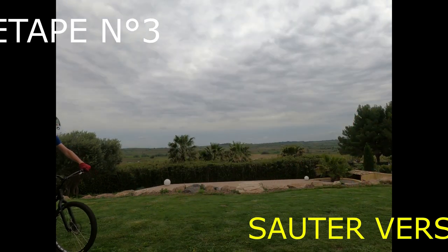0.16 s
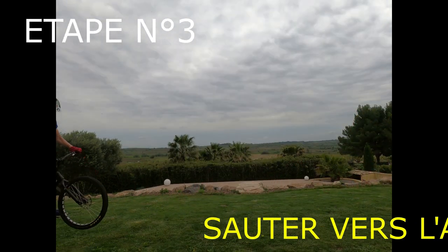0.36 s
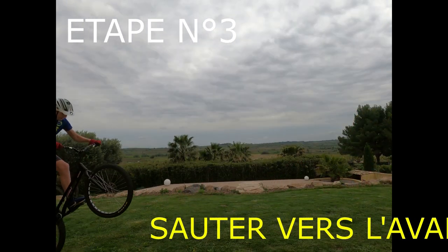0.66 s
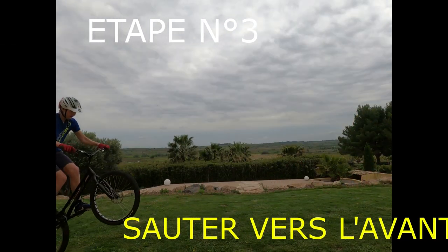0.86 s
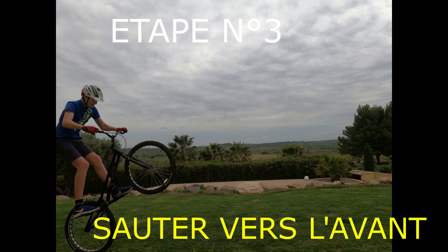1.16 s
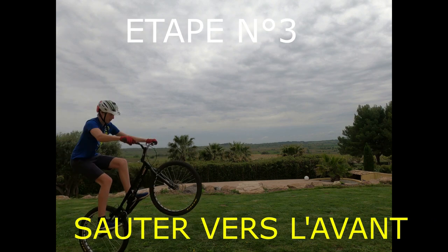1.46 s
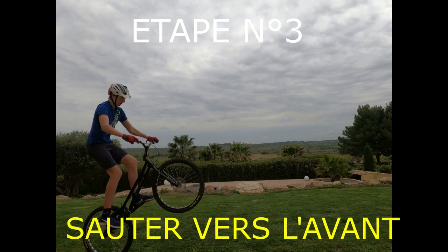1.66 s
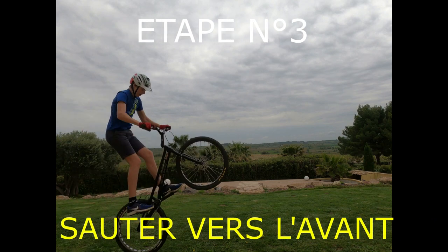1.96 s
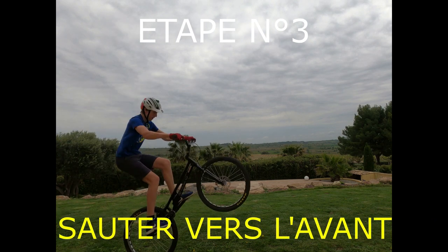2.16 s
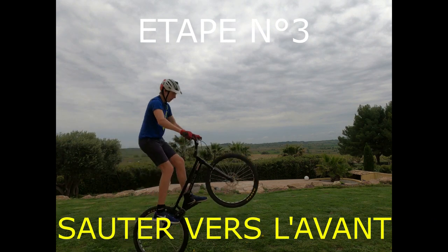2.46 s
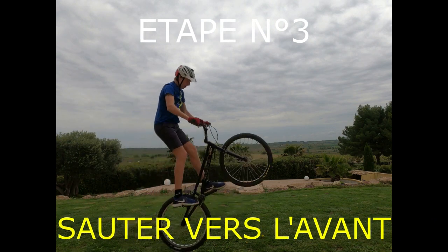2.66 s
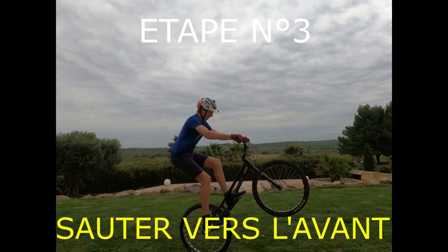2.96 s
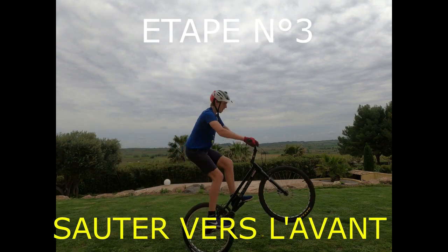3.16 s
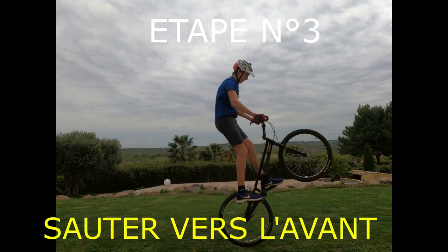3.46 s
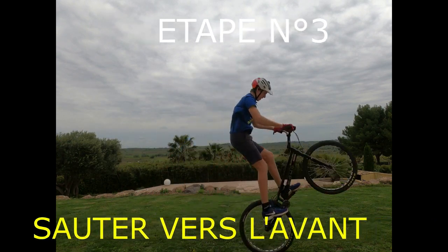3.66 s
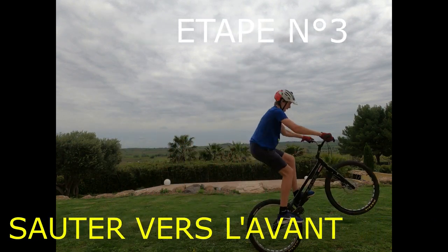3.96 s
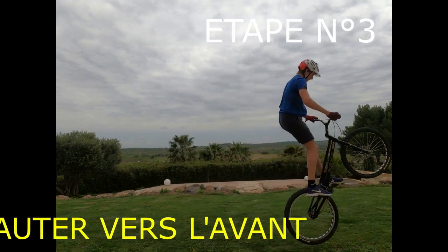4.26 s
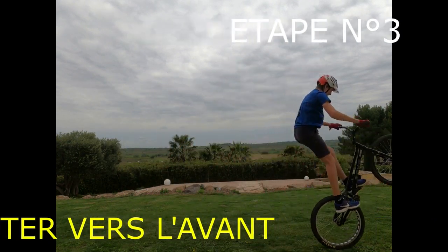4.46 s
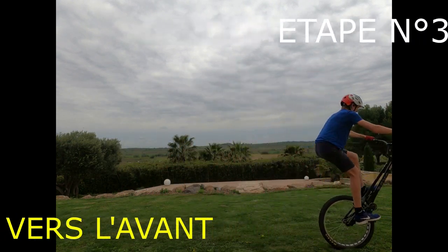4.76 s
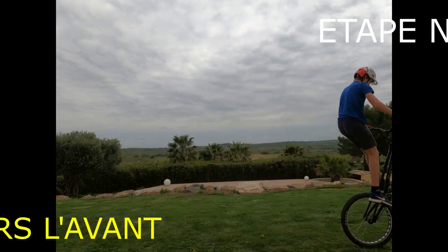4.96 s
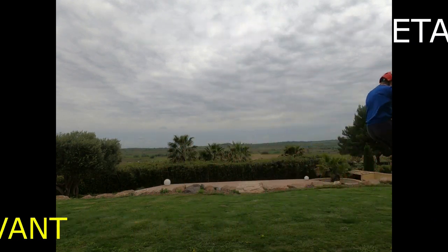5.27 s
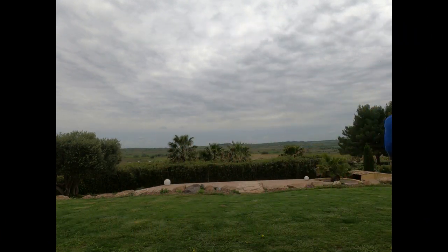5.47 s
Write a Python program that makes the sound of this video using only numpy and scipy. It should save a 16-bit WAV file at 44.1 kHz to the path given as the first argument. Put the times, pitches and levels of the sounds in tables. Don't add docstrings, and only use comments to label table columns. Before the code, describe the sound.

Outdoors on a lawn, a bicycle hops on its rear wheel near a small camera. Bursts of freewheel clicking and chain whirr alternate with dull frame knocks. The rim brake gives tiny chirps and a few loud, brief squeals. Quiet distant traffic, leaves and a faint hum lie beneath. Low wind rumble swells into a rough, popping gust late, strongest on the right; the image is almost mono before that.

```python
import sys
import numpy as np
from scipy import signal
from scipy.fft import rfft, irfft, next_fast_len
from scipy.io import wavfile
from scipy.ndimage import uniform_filter1d

SR = 44100
rng = np.random.default_rng(int(sys.argv[2]) if len(sys.argv) > 2 else 0)


def linear_from_db(decibels):
    return 10 ** (np.asarray(decibels, float) / 20)


def master(y):
    cut = np.clip(np.atleast_2d(y).T, -1, 1)
    pcm = np.round(cut * 32767)
    wavfile.write(sys.argv[1], SR, pcm.astype(np.int16))


N = 248062

CALM_HZ, CHATTER_SPAN_HZ, CREEP_SHARP = 1135, 40, 0.017


def curve(rows):
    return np.interp(np.arange(N) / SR, *np.transpose(rows))


def gated(rows, fade, tail):
    t = np.arange(N) / SR
    on = np.zeros(N)
    for start, end, first_db, last_db in rows:
        on += (t >= start) * (t < end) * linear_from_db(np.interp(t, [start, end], [first_db, last_db]))
    keep = np.exp(-1 / (tail * SR))
    dying = signal.lfilter([1 - keep], [1, -keep], on)
    return uniform_filter1d(np.maximum(on, dying), int(fade * SR))


def read(points, hz):
    f, value = np.transpose(points)
    return np.interp(np.log(hz + 1), np.log(f + 1), value)


def evened(x):
    return x / np.sqrt(np.mean(x ** 2) + 1e-20)


def band(x, lo_hz, hi_hz, order=2):
    return signal.sosfilt(signal.butter(order, [lo_hz, hi_hz], "bandpass", fs=SR, output="sos"), x)


def wobble(count, rate_hz):
    size = next_fast_len(count)
    hz = np.fft.rfftfreq(size, 1 / SR)
    spectrum = rfft(rng.standard_normal(size)) * (hz > 0) / (1 + (hz / rate_hz) ** 4)
    return evened(irfft(spectrum, size)[:count])


def coloured(x, points):
    size = next_fast_len(N)
    gain = linear_from_db(read(points, np.fft.rfftfreq(size, 1 / SR)))
    return irfft(rfft(x, size) * gain, size)[..., :N]


def resonate(x, hz, width):
    return signal.lfilter(*signal.iirpeak(hz, hz / width, SR), x)


def add(mix, s, sound):
    part = mix[round(s * SR):][:len(sound)]
    part += sound[:len(part)]


def brake():
    # grab_s, level_db, pitch_hz, hold_s, bite_db (added to the overtones)
    slips = [
        (0.975, -34.5, 1151, 0.005, 3),
        (1.247, -34.5, 1182, 0.0079, 5),
        (1.279, -44, 1086, .005, 4),
        (1.358, -52, 1120, 0.0055, 6),
        (1.997, -38, 1135, 0.01, -22),
        (2.037, -48, 1135, .008, -28),
        (2.751, -49.5, 1130, 0.011, 11),
        (3.294, -38, 1155, 0.0075, -13),
        (4.092, -46, 1084, 0.0073, -21),
    ]
    # time_s, level_db, pitch_hz, second_db, upper_db (overtones)
    squeezes = [
        [(.562, -50, 1160, -11, -25), (.576, -41.5, 1194, 0, -24), (.584, -42.5, 1146, -1, -7),
         (.594, -18, 1119, 0, -6.5), (.601, -21, 1158, -7, -9.5), (.608, -15.5, 1150, -10, -19),
         (.62, -23, 1123, -3.5, -29), (.634, -23.5, 1116, -11, -24), (.67, -44, 1170, -17, -25)],
        [(3.535, -45, 1122, -18, -30), (3.552, -30, 1154, -15, -32), (3.563, -18.5, 1114, -13, -20.5),
         (3.57, -16, 1118, -5.5, -16), (3.577, -20, 1119, -14, -18), (3.583, -19, 1124, -7, -8.5),
         (3.592, -30.5, 1125, -7, -10), (3.606, -25.5, 1103, -12.5, -28), (3.65, -47, 1103, -8, -25)],
        [(5.155, -45, 1140, -18, -22), (5.167, -29, 1135, -11, -16), (5.175, -21, 1140, 3, -9.5),
         (5.186, -28.5, 1149, -12, -16.5), (5.193, -31.5, 1138, -3, -14), (5.21, -24.5, 1120, -16, -26),
         (5.222, -42, 1174, 0, -22), (5.236, -32, 1153, -7, -17.5), (5.295, -50.5, 1150, 1, -11)],
        [(4.378, -44, 1150, -10, -25), (4.392, -48, 1136, -13, -32), (4.403, -25.5, 1146, -22, -27),
         (4.412, -34, 1156, -0.5, -28), (4.422, -45.5, 1142, -3, -26), (4.434, -40.5, 1113, -1.5, -18),
         (4.48, -53, 1150, -3, -18)],
        [(4.605, -59, 1201, 7, -17), (4.618, -28, 1190, -6.5, -30), (4.628, -34.5, 1218, -5, -18),
         (4.636, -56.5, 1197, 14, -16), (4.644, -31, 1204, -11, -26), (4.666, -44, 1185, -7, -23),
         (4.69, -44, 1166, -16, -20), (4.72, -52, 1160, -9, -17)],
    ]
    judders = [.014, .01, .034, .022, .03]
    out = np.zeros(N)
    for row in slips:
        add(out, *chirp(slip(*row), loose=1, judder=.004))
    for rows, judder in zip(squeezes, judders):
        add(out, *chirp(rows, loose=0, judder=judder))
    return out


def slip(s, db, hz, hold, bite_db):
    creep_s, ring_s = .03, .13
    creep_db, sag_db, release_db_per_s = db - 25, db - 4, 480
    second_db, upper_db = bite_db / 2 - 9, bite_db - 13
    scoop = 0.056 * np.clip((hz - CALM_HZ) / CHATTER_SPAN_HZ + 0.36, 0, 1)
    loose_hz, loose_overtones = hz * (1 - 0.012), (second_db - 4.5, upper_db - 4)
    grab_s = min(0.013 + .0005 * max(-27 - db, 0), creep_s * 4 / 5)
    return [(s - creep_s, creep_db, hz * (1 + CREEP_SHARP), *loose_overtones),
            (s - grab_s, creep_db, hz * (1 - scoop), second_db, upper_db),
            (s, db, hz * (1 - scoop / 2), second_db, upper_db),
            (s + hold, sag_db, hz, second_db, upper_db),
            (s + 2 * hold, sag_db - release_db_per_s * hold, loose_hz, *loose_overtones),
            (s + ring_s, sag_db - release_db_per_s * (ring_s - hold), loose_hz, *loose_overtones)]


def chirp(rows, loose, judder):
    # multiple, level_db
    overtones = [(3, 0), (4, -2.5), (5, -7), (6, -11.5), (7, -10), (8, -13.5), (9, -18.5), (10, -24),
                 (11, -25), (12, -24.5), (13, -36)]
    s, *columns = np.transpose(rows)
    t = np.arange(s[0], s[-1], 1 / SR)
    count = len(t)
    level_db, hz, second_db, upper_db = (np.interp(t, s, c) for c in columns)
    weak = loose * np.clip((-16.0 - level_db) / 18, 0, 1)
    level_db = uniform_filter1d(level_db, int(.004 * SR))
    pull, span = linear_from_db(level_db), int(.005 * SR)
    hz = uniform_filter1d(hz * pull, span) / uniform_filter1d(pull, span)
    chatter = loose * np.clip((hz.max() - CALM_HZ * (1 + CREEP_SHARP)) / CHATTER_SPAN_HZ, 0, 1)
    level_db = level_db + 3 * chatter * wobble(count, 90)
    waver = (judder + .014 * weak + .016 * chatter) * wobble(count, 250)
    waver = waver - uniform_filter1d(waver, int(.012 * SR))
    level_db = level_db + 60 * judder * wobble(count, 120)
    turns = np.cumsum(hz * (1 + waver)) / SR
    second = linear_from_db(second_db + 2.1 * wobble(count, 60))
    stack = np.cos(2 * np.pi * turns) + second * np.cos(2 * np.pi * (2 * turns + rng.random()))
    for k, db in overtones:
        gain = linear_from_db(db + upper_db - 12.4 * weak + 3 * wobble(count, 80))
        stack += gain * np.cos(2 * np.pi * (k * turns + rng.random()))
    return s[0], 1.56 * linear_from_db(level_db) * stack * signal.windows.tukey(count, .15)


def hub(x):
    # frequency_hz, level_db
    hub_colour = [(1820, -7), (3100, -3.5), (3250, -9), (3650, -6.5), (4870, 0.5), (6340, -6), (7110, -11),
                  (8650, -8.5), (11700, -18.5), (13200, -20), (15600, -27)]
    # frequency_hz, width_hz, level_db
    hub_rings = [(2750, 160, -33), (5000, 370, -19), (6170, 200, -13), (8650, 140, -7), (10300, 150, -8)]
    x = coloured(x, hub_colour)
    return 0.84 * x + sum(linear_from_db(db) * resonate(x, hz, width) for hz, width, db in hub_rings)


def freewheel():
    # click_s, peak_db
    pawls = [(0.0057, -46), (0.024, -47), (0.0407, -43), (0.0597, -41), (0.0726, -45), (0.0901, -41),
             (0.1092, -47), (0.1175, -48), (0.666, -41), (0.6838, -45), (0.6965, -46), (0.7125, -44),
             (0.7288, -45), (0.7432, -41), (0.757, -44), (0.7677, -40), (0.7784, -45),
             (0.7865, -42.5), (0.7952, -44), (0.806, -48), (0.828, -36), (0.9102, -42.5),
             (0.9776, -55), (1.1166, -47), (1.1281, -53), (1.1504, -54), (1.1592, -46), (1.1865, -44),
             (1.2078, -38), (1.2234, -44), (1.2323, -39), (1.2558, -44), (1.2717, -46), (1.2835, -56),
             (1.3027, -38), (1.3135, -48), (1.335, -39), (1.3547, -40), (1.3628, -48),
             (1.3806, -35.5), (1.3971, -54), (1.4156, -39), (1.4314, -36), (1.454, -39),
             (1.4662, -43), (1.4778, -36), (1.4995, -45), (1.5164, -37), (1.527, -46),
             (1.8966, -51), (1.9183, -55), (1.936, -39), (1.9561, -42), (1.9662, -37.5),
                    (1.981, -43.5), (1.9945, -40), (2.0152, -42), (2.048, -41), (2.077, -39.5),
                    (2.1082, -38.5), (2.1427, -40.5), (2.1565, -41.5), (2.1788, -40), (2.1948, -36.5),
                    (2.2068, -38), (2.222, -40), (2.2412, -38), (2.2651, -41), (2.2784, -36), (2.3006, -42),
                    (2.3181, -36.5), (2.4652, -58), (2.6807, -38.5), (2.695, -40), (2.7066, -37.5),
                    (2.7253, -39), (2.7642, -44), (2.7842, -46), (2.8021, -47), (2.855, -38), (2.9032, -36),
                    (2.958, -37.5), (2.9809, -44), (2.9902, -45), (2.9995, -38), (3.0116, -46),
                    (3.026, -42), (3.0419, -37.5), (3.0595, -39), (3.0709, -36.5), (3.0968, -37),
                    (3.1126, -39), (3.1492, -39), (3.19, -48), (3.2501, -81),
             (3.4791, -49.5), (3.4883, -45), (3.4973, -47), (3.5065, -40), (3.5155, -38), (3.543, -36),
                  (3.634, -48), (3.666, -39.5), (3.6784, -46), (3.7001, -54), (3.7121, -49), (3.724, -47),
                  (3.7708, -51), (3.7892, -36.5), (3.8467, -42), (3.867, -41), (3.898, -45), (3.9192, -47),
                  (3.9434, -50), (4.2771, -50), (4.3077, -46), (4.3409, -54), (4.358, -49), (4.3712, -52),
                  (4.3835, -50), (4.4297, -45), (4.4535, -49), (4.485, -53), (4.4957, -53), (4.5327, -53),
                  (4.5459, -51), (4.5732, -43), (4.6356, -43), (4.6461, -45), (4.6581, -43), (4.6696, -38),
                  (4.6864, -45), (4.6976, -41), (4.7231, -37), (4.746, -42), (4.7566, -58), (5.2194, -47),
                  (5.2289, -50), (5.2762, -52), (5.2855, -52), (5.293, -43), (5.3393, -44), (5.3504, -48),
                  (5.4296, -47.5), (5.4566, -45), (5.4905, -47), (5.5109, -50), (5.5329, -42),
                  (5.5601, -48), (5.5988, -45)]
    # start_s, end_s, first_db, last_db
    whirr_spans = [(0.0, .13, -58, -61), (.6, .85, -45.5, -61), (1.146, 1.3, -43.5, -52.5),
                   (1.38, 1.535, -51, -59), (1.84, 1.925, -68, -62), (1.929, 2.07, -45, -60.5),
                   (2.17, 2.34, -52, -55), (2.68, 2.815, -55, -57), (2.98, 3.165, -45, -57.5),
                   (3.33, 3.47, -70, -62), (3.473, 3.76, -44, -62.5), (3.765, 3.96, -48, -53.5),
                   (4.23, 4.5, -60.5, -58.5), (4.5, 4.775, -60, -51), (4.92, 5.12, -81, -63),
                   (5.127, 5.37, -45, -60.5), (5.426, 5.62, -53.5, -57)]
    t = np.arange(1500) / SR
    jangle = linear_from_db(-60 * t / 0.079) / (1 + (t / 0.031) ** 8)
    snap = np.minimum(t / 0.0013, 1) * (1.18 * linear_from_db(-60 * t / 0.0091) + .5 * jangle)
    clicks = np.zeros(N)
    for s, db in pawls:
        add(clicks, s, linear_from_db(db - 2.0) * snap)
    strength = linear_from_db(4.6 * np.minimum(rng.exponential(1, N), 3))
    links = strength * (rng.random(N) < 4000 / SR) * rng.choice([-1, 1], N)
    ratchet = np.cumsum(60 * (1 + 0.16 * wobble(N, 13.0))) / SR
    teeth = .5 + 0.3 * np.exp(-(ratchet % 1) / 0.11)
    whirr = evened(hub(links)) * gated(whirr_spans, fade=0.0066, tail=0.0026)
    whirr *= linear_from_db(4.5 + 1.47 * wobble(N, 41)) * teeth
    noise = rng.standard_normal(N)
    return whirr + hub(noise * clicks) / np.std(hub(noise))


def knocks():
    # start_s, peak_db, tube_hz, low_hz, low_db
    blows = [(0.235, -54, 1350, 600, -4), (0.832, -44, 1670, 615, -23), (0.892, -32, 1440, 559, -1.5),
             (0.961, -25, 2144, 699, -12.5), (1.116, -37, 1540, 640, -5), (1.356, -29.5, 2200, 476, -10),
             (1.71, -25, 1580, 498, -10), (1.902, -31, 1440, 680, -24), (2.699, -34, 2140, 619, -36),
             (2.958, -32.5, 2220, 486, -19), (3.19, -28, 1415, 590, -13.5), (3.775, -32.5, 1590, 517, -11),
             (4.084, -36.5, 1550, 672, -3), (4.613, -23, 2210, 527, -26), (4.923, -31, 1635, 807, -4.5),
             (5.127, -32.5, 1420, 570, -21), (5.429, -33.5, 1670, 513, -5.5)]
    out, t = np.zeros(N), np.arange(3000) / SR
    rise = np.minimum(t / 0.0008, 1)
    for s, db, tube_hz, low_hz, low_db in blows:
        noise = rng.standard_normal(3000)
        puff = evened(band(noise, 550, 2640, order=3)) * linear_from_db(-60 * t / 0.12)
        tube = 1.9 * np.sin(2 * np.pi * tube_hz * t) * linear_from_db(-60 * t / 0.043)
        low = np.sin(2 * np.pi * low_hz * t) * linear_from_db(low_db + 7.5 - 60 * t / 0.12)
        add(out, s, linear_from_db(db - 12.5) * (puff + tube + low) * rise)
    return out


def facing(x):
    # time_s, level_db
    treble = [(0, 7), (.6, 4), (2.3, 5), (3.6, 1), (3.95, -4.5), (4.4, -6), (5.2, -6), (5.62, 7)]
    dull = coloured(x, [(5000, 0.5), (9000, -8.0), (13000, -34)])
    return dull + linear_from_db(curve(treble)) * (x - dull)


def yard(x):
    # frequency_hz, t60_s
    decay = [(500, 0.35), (1130, 0.56), (2300, 0.54), (3400, 0.58), (5000, 0.37), (10000, 0.36)]
    taps = np.zeros((2, SR // 2))
    slots = np.arange(500, SR // 2 - 20, 20)
    at = slots + rng.integers(0, 20, (2, len(slots)))
    np.put_along_axis(taps, at, rng.choice([-1., 1.], at.shape), 1)
    hz, t, z = signal.stft(taps, SR, nperseg=256)
    tail = signal.istft(z * linear_from_db(-60 * t / read(decay, hz)[:, None]), SR, nperseg=256)[1]
    return signal.fftconvolve(x[None], tail / np.linalg.norm(tail[0]), axes=1)[:, :N]


def wind():
    # time_s, strength_db
    breeze = [(0, -47), (1.05, -48.5), (1.6, -43), (2.1, -45.5), (3.0, -43), (3.7, -45.5), (4.02, -47.5),
              (4.18, -32.5), (4.3, -21), (4.75, -24.5), (5.05, -43), (5.62, -28.5)]
    # start_s, end_s, first_db, last_db
    roar_spans = [
        (4.235, 4.405, -21, -25.5),
        (4.445, 4.745, -26.5, -29),
        (4.84, 4.96, -44, -55),
        (5.42, 5.56, -46, -55),
    ]
    breeze_db = curve(breeze)
    flutter_db = 0.86 * (breeze_db + 47) - 48.5
    a, b, c = rng.standard_normal((3, 2, N))
    lumps = np.clip([wobble(N, 12), wobble(N, 12)], -2, 1.2)
    rumble = evened(band(a, 27.9, 83.5)) * gusty(breeze_db, column=1) * linear_from_db(2.0 + 2.0 * lumps)
    flutter = evened(band(b, 116.5, 199.6)) * gusty(flutter_db, column=2) * linear_from_db(-4.0 + 3.73 * lumps)
    roar = evened(coloured(c, [(100, -19), (220, 6.5), (500, -4.0), (1000, -20.0), (2000, -81)]))
    roar *= gated(roar_spans, fade=.014, tail=0.0053) * linear_from_db(-1.0 + 3.7 * wobble(N, 54))
    exposure = linear_from_db(np.array([[-14], [1.5]]))
    return rumble + flutter + (roar + turbulence()) * exposure


def gusty(breeze_db, column):
    # peak_s, rumble_db, flutter_db, half_width_s
    gusts = [(.02, -63, -44, 0.14), (0.331, -32, -31.5, 0.048), (.56, -37, -44, 0.074),
             (1.37, -38.5, -45, 0.042), (2.2, -37.5, -38, 0.04), (2.36, -37, -63, 0.12),
             (2.52, -34.5, -49, 0.043), (3.0, -35.5, -45, 0.017), (3.2, -37, -40, 0.023),
             (3.869, -31, -37, 0.071), (4.309, -26, -18, 0.048), (4.728, -20, -20, 0.035),
             (4.902, -21.5, -23, 0.055), (5.081, -26.5, -47, 0.039), (5.19, -27, -59, 0.027),
             (5.33, -28.5, -36, 0.023), (5.6, -23.5, -20, 0.033)]
    t = np.arange(N) / SR
    bells = sum(linear_from_db(2 * row[column]) * np.exp(-((t - row[0]) / row[3]) ** 2) for row in gusts)
    return np.sqrt(linear_from_db(2 * breeze_db) + bells)


def turbulence():
    # start_s, peak_db, edge_db
    eddies = [(3.795, -34.5, 15), (3.891, -33, 12), (4.247, -23, -35), (4.261, -15, -30), (4.278, -21, -33),
              (4.292, -35, -30), (4.309, -36, -32), (4.319, -15.5, -41), (4.33, -17, -41),
              (4.338, -16, -40), (4.356, -21, -33), (4.365, -24, -32), (4.384, -23, -28),
              (4.394, -19.5, -30), (4.414, -37, -10), (4.438, -33, -22), (4.455, -13, -32),
              (4.474, -46, -24), (4.493, -18, -38), (4.529, -20.5, -41), (4.544, -18, -39),
              (4.552, -30, -25), (4.575, -22.5, -39), (4.591, -19.5, -26), (4.598, -18, -40),
              (4.608, -17, -37), (4.637, -17, -2), (4.648, -26, -29), (4.659, -36, -22),
              (4.676, -18.5, -27), (4.697, -20.5, -31), (4.714, -26.5, -24), (4.726, -33, -25),
              (4.758, -37, -25), (4.84, -35, -15), (4.872, -32, -23), (4.905, -39, -22), (4.927, -30, 0),
              (5.444, -46, -9), (5.57, -54, -8), (5.584, -50, -12), (5.61, -44, -11)]
    bursts, flicks, t = np.zeros(N), np.zeros(N), np.arange(1200) / SR
    body, edge = pop(276, 680), pop(880, 1970)
    for s, db, edge_db in eddies:
        add(bursts, s - .003, linear_from_db(db - 1.0 - 60 * t / 0.043) * np.minimum(t / 0.0034, 1))
        flick = body + linear_from_db(min(edge_db, -24) + 14.5) * edge
        add(flicks, s - .002, rng.choice([-1, 1]) * linear_from_db(db - 1.5) * flick)
    noise = rng.standard_normal((2, N))
    colour = [(100, -8), (250, 4.5), (600, -4.5), (1200, -9.5), (1900, -38.5), (3000, -83)]
    return bursts * evened(coloured(noise, colour)) + flicks


def pop(lo_hz, hi_hz):
    flick = band(band(signal.unit_impulse(1200), lo_hz, hi_hz), 60, 1730, order=6)
    return flick / abs(flick).max()


def air():
    # frequency_hz, level_db
    air_colour = [(200, -36), (340, -13.5), (769, -5), (846, -11.5), (1180, 1.5), (1280, -3), (1910, -8.5),
                  (2210, -7), (2390, -14), (3990, -17.5), (4400, -19), (9480, -35.5), (15600, -54)]
    # time_s, level_db
    swell = [(0, 1), (2, -1.5), (3.2, 1), (4.5, -2.5), (5.05, 1.5), (5.62, 5)]
    frames, hz = N // 256 + 5, np.fft.rfftfreq(1024, 1 / SR)
    a, b, c, d, patches = rng.standard_normal((frames, 513, 5)).T
    patches = evened(uniform_filter1d(uniform_filter1d(patches, 12, 0), 14, 1))
    side_db = read([(300, -13.0), (1500, -9.0), (5000, 0.0), (9000, -2)], hz)
    mid, side = a + 1j * b, linear_from_db(side_db)[:, None] * (c + 1j * d)
    far_db = 8 * np.clip(hz / 9000 - 1, 0, 1)[:, None]
    z = np.array([mid + side, mid - side]) * linear_from_db(read(air_colour, hz)[:, None] + 1.6 * patches - far_db)
    wash = signal.istft(z, nperseg=1024, noverlap=768)[1][:, :N]
    wash = wash / np.std(band(wash.mean(0), 217, 15000)) * linear_from_db(-51.5 + curve(swell))
    hum_hz, hum_width_hz = 271, 27
    hum = resonate(resonate(rng.standard_normal(N), hum_hz, hum_width_hz), hum_hz, hum_width_hz)
    return wash + linear_from_db(-58.5) * evened(hum)


def scene():
    squeal, parts = facing(brake()), facing(freewheel() + knocks())
    bike = squeal + parts
    direct = np.array([bike, np.roll(bike, shift=1)])
    return direct + yard(linear_from_db(-15.0) * squeal + linear_from_db(-13.0) * parts) + wind() + air()


def roll_off(x):
    return signal.sosfilt(signal.butter(12, 15710, fs=SR, output="sos"), x)


def record(dry):
    # time_s, level_db
    width = [(0, -82), (2.1, -68), (2.3, -22.5), (2.8, -10.5), (4.1, -4.5), (4.35, 2.5), (4.7, -5.5),
             (5.1, -27.5), (5.5, -41)]
    mid, side = (dry[0] + dry[1]) / 2, (dry[0] - dry[1]) / 2
    opened = np.clip(linear_from_db(curve(width) + 0.5), 0, 1)
    treble_side = linear_from_db(-17.5) * coloured(side, [(3000, -25.5), (5000, -2.5), (10500, -0.5), (12000, 11)])
    side = opened * side + (1 - opened) * treble_side
    return roll_off(np.array([mid + side, mid - side]))


dry = scene()
out = record(dry)
master(out)
```